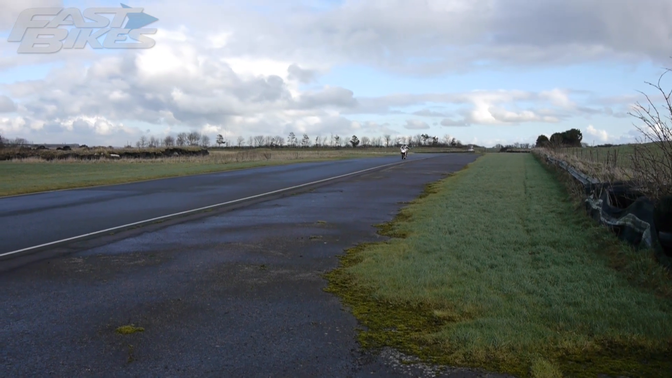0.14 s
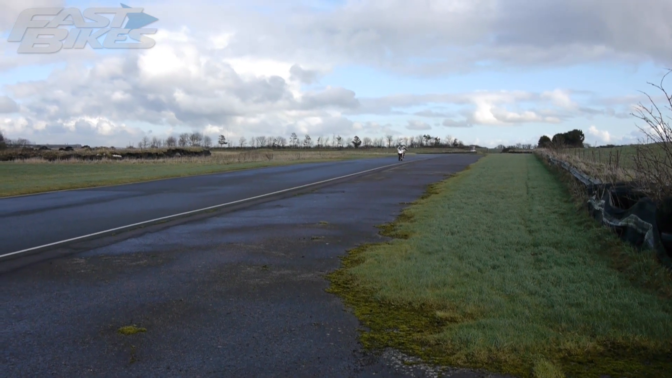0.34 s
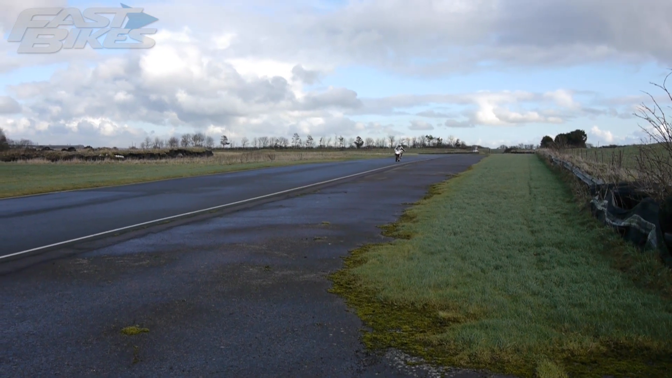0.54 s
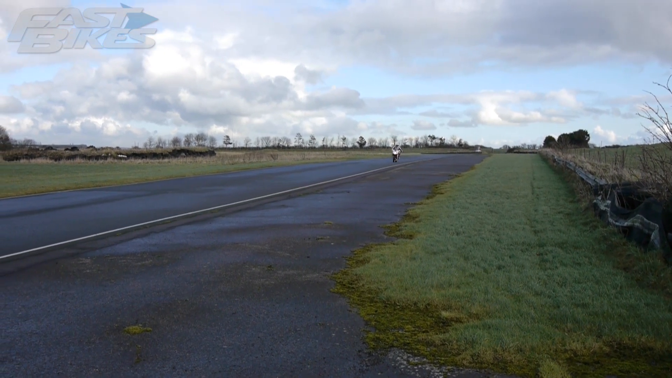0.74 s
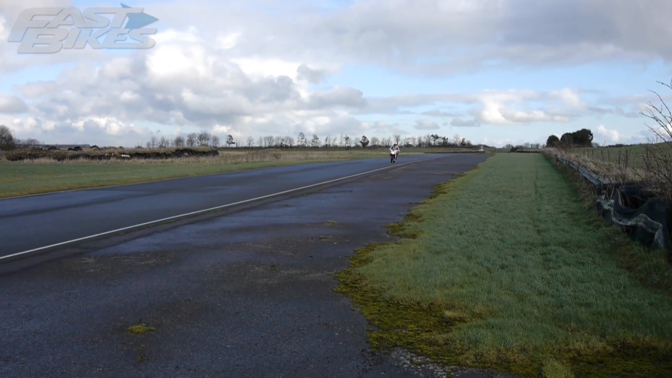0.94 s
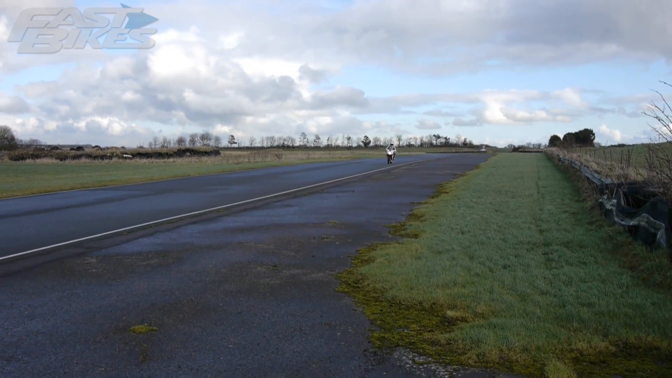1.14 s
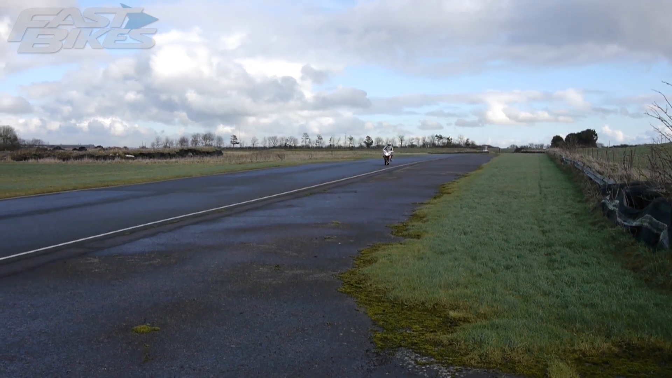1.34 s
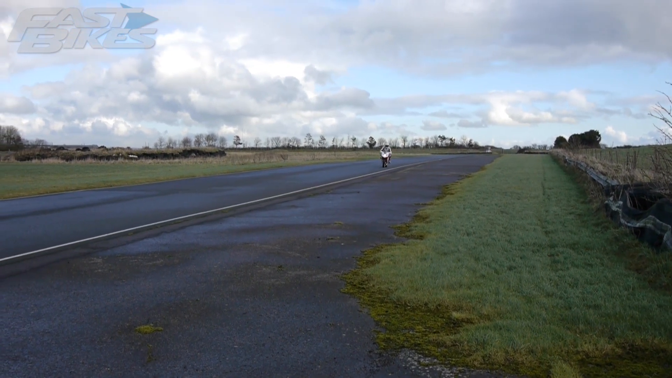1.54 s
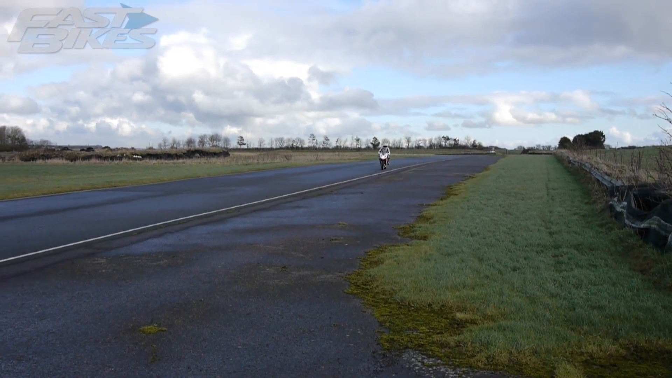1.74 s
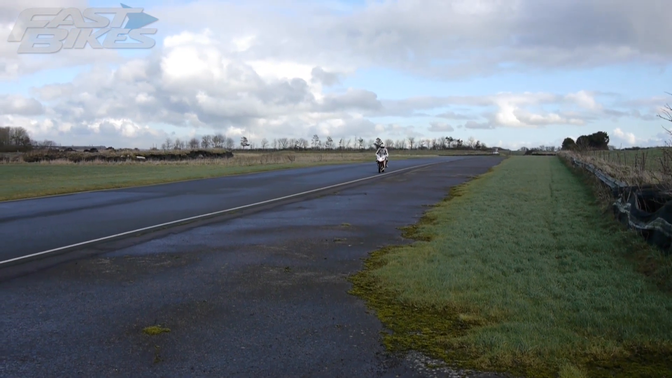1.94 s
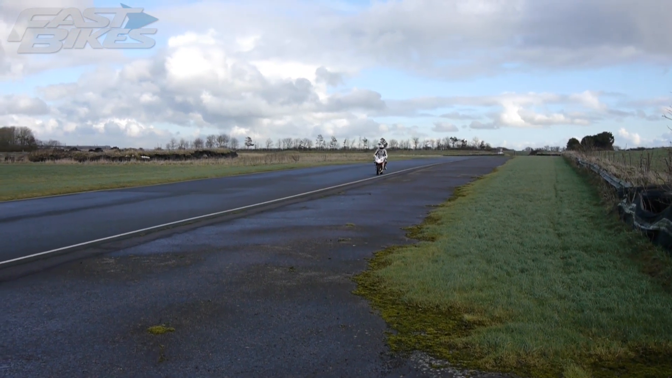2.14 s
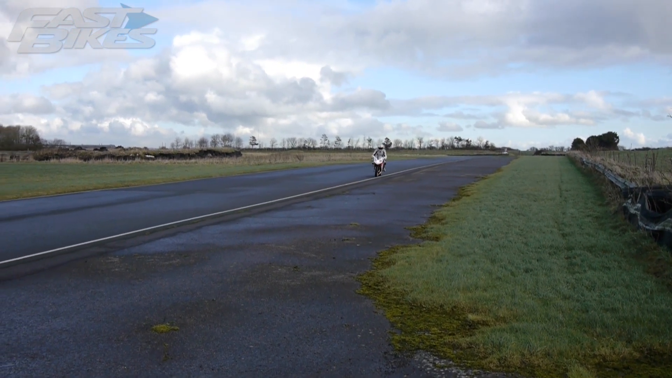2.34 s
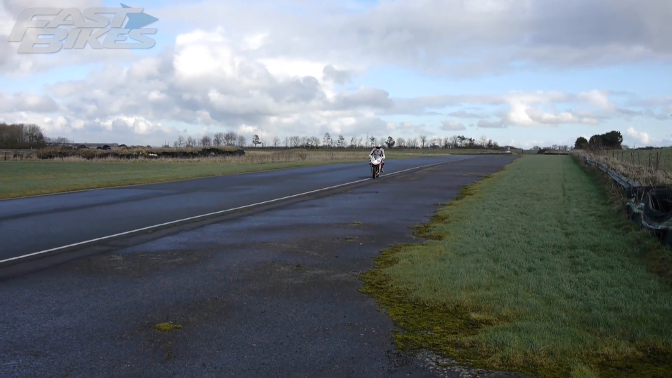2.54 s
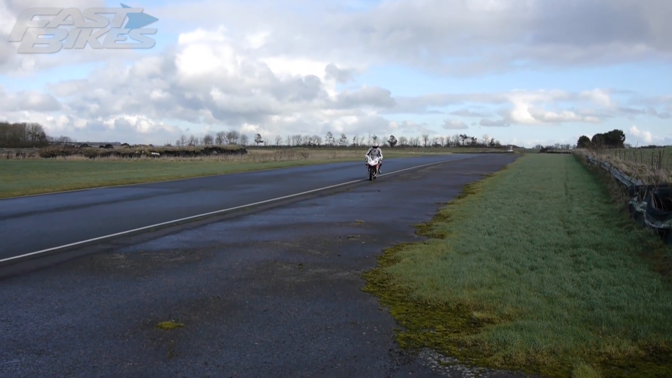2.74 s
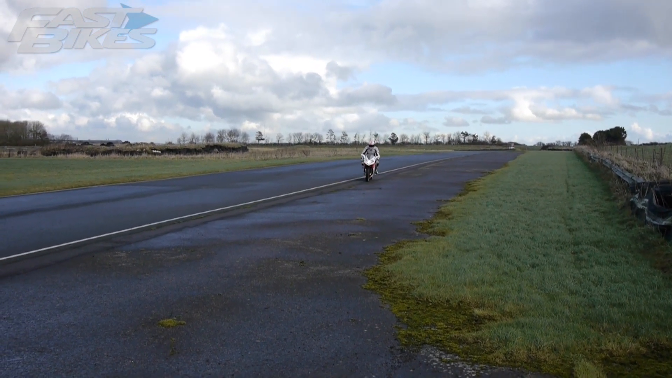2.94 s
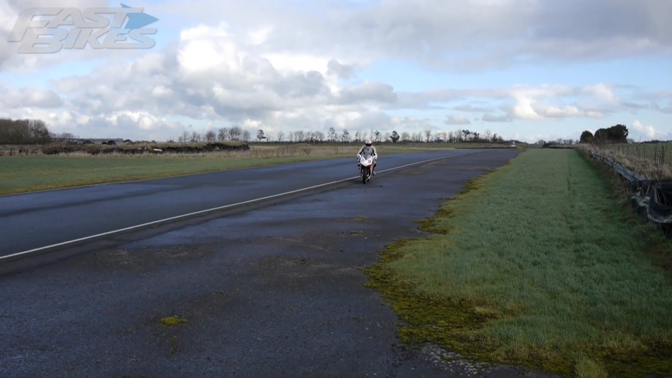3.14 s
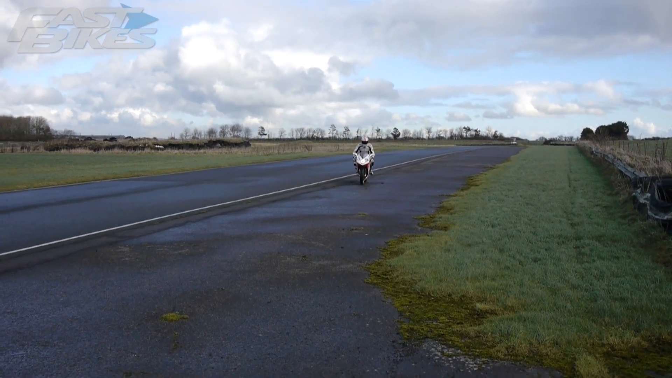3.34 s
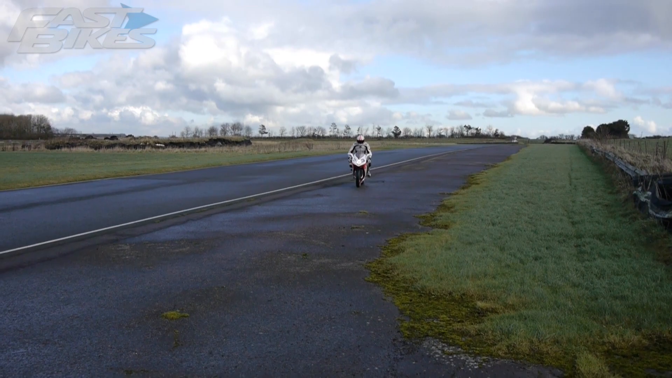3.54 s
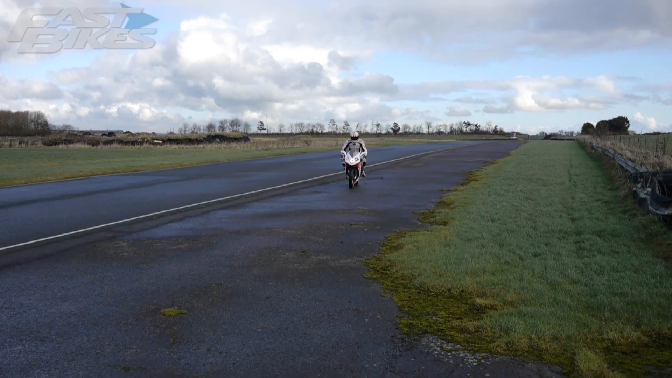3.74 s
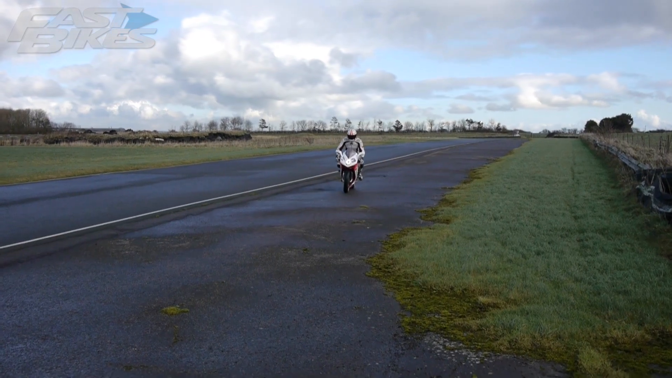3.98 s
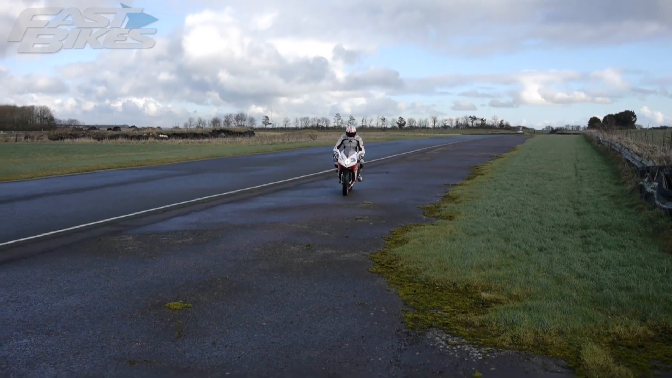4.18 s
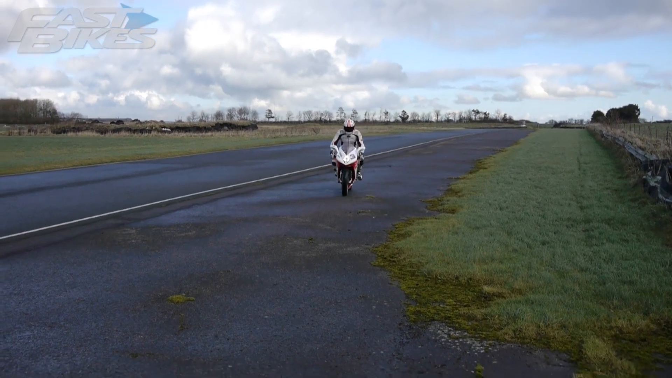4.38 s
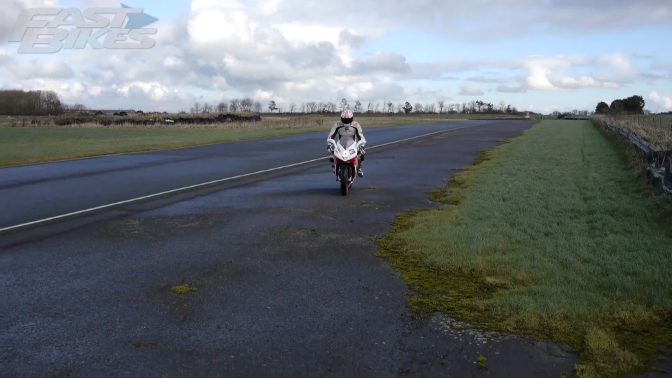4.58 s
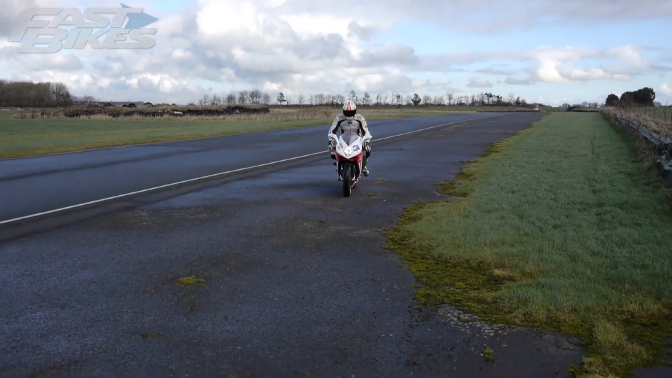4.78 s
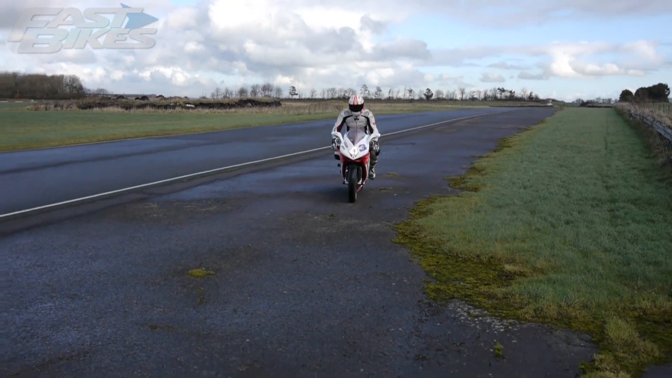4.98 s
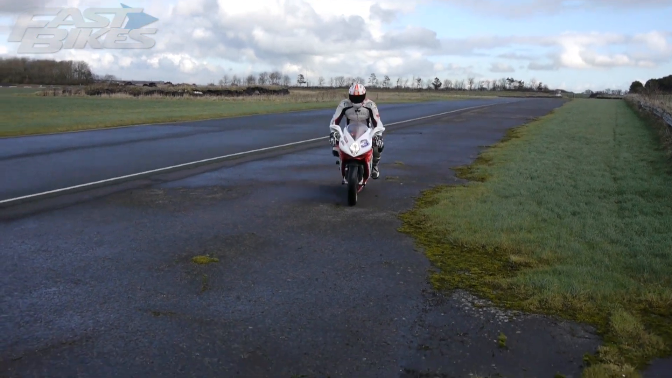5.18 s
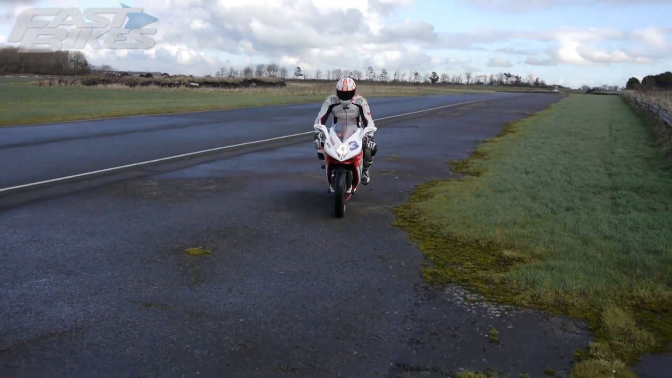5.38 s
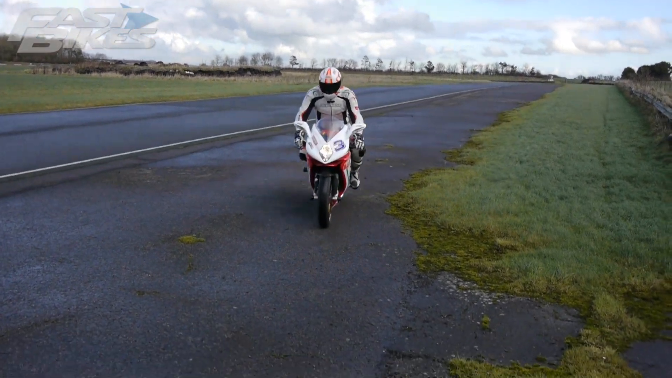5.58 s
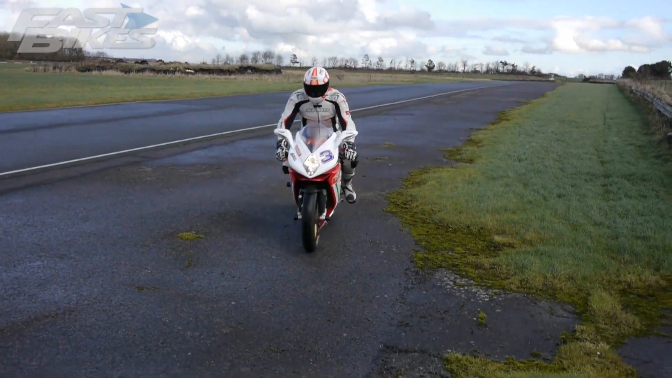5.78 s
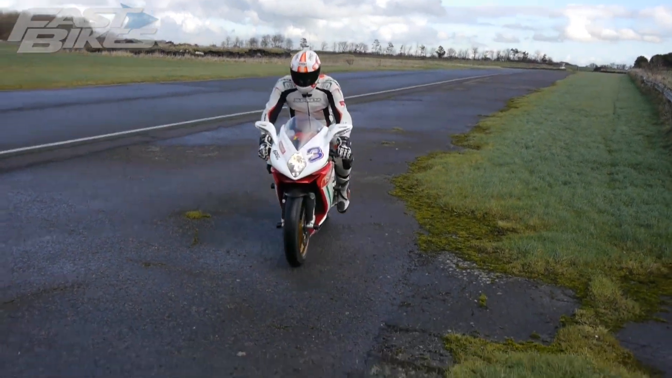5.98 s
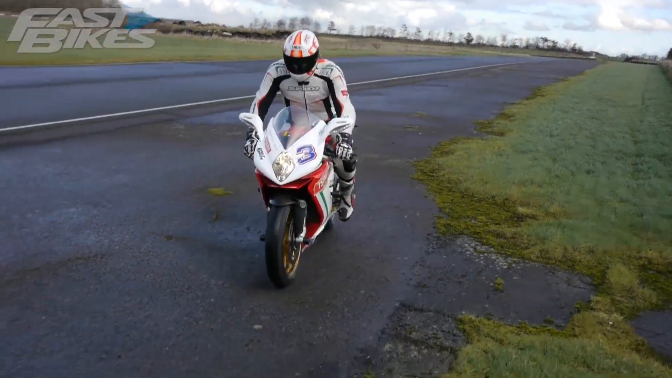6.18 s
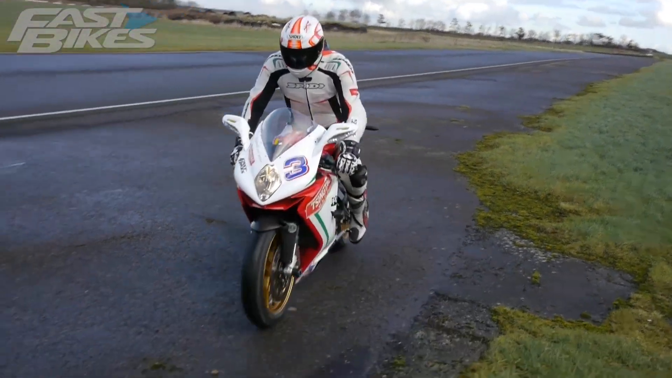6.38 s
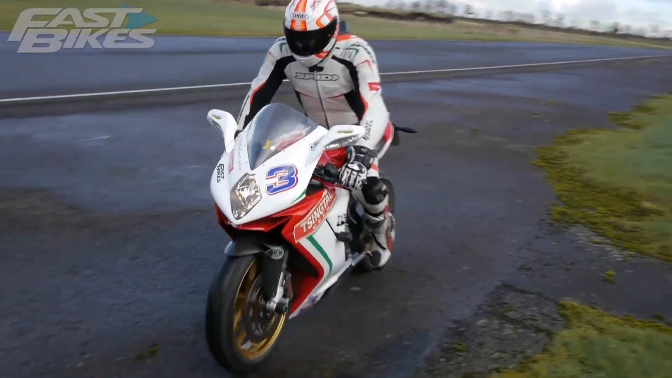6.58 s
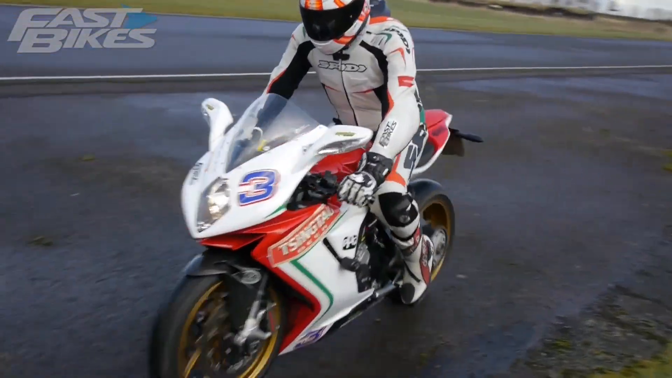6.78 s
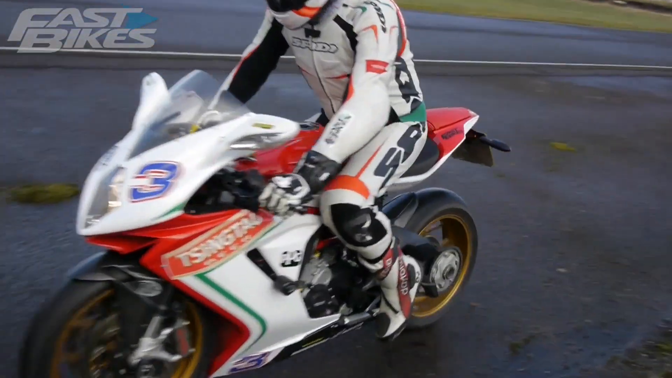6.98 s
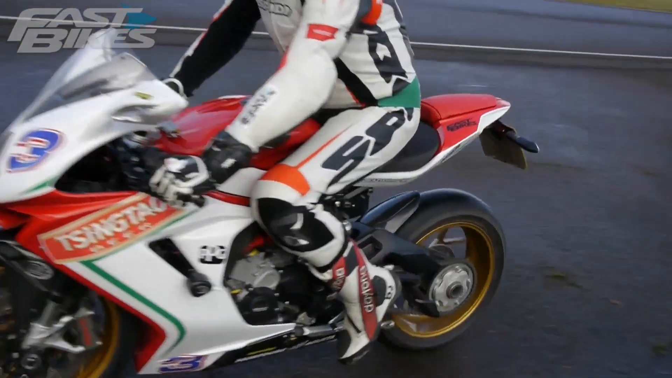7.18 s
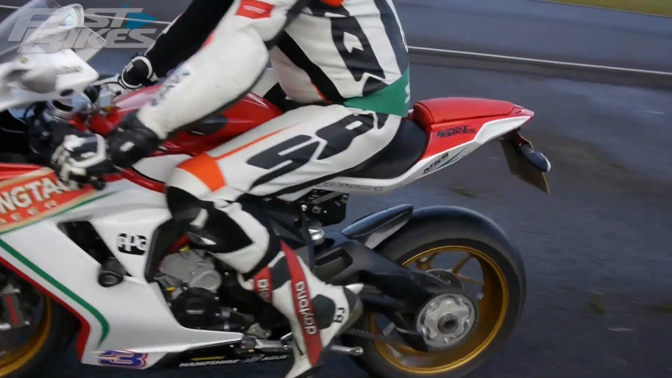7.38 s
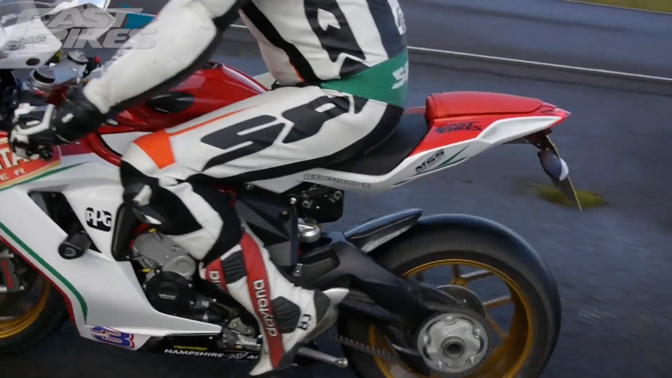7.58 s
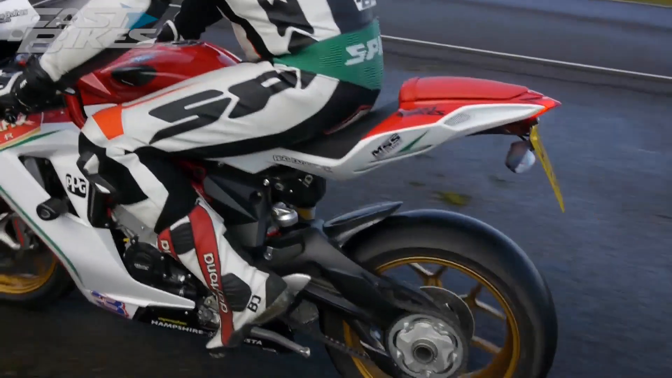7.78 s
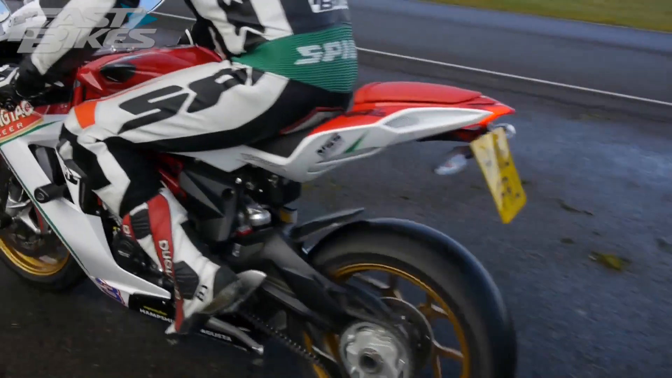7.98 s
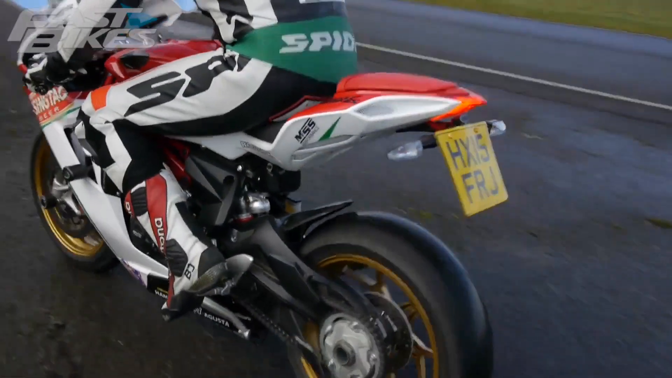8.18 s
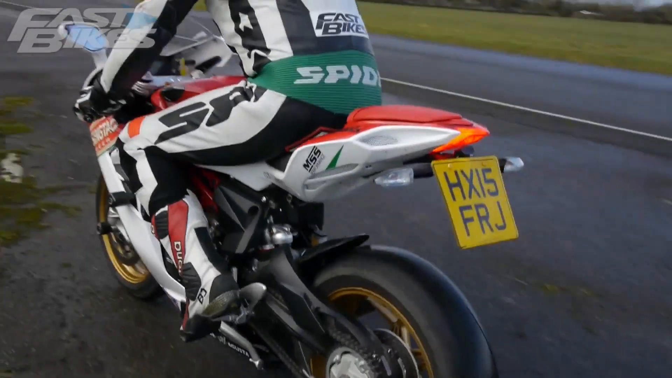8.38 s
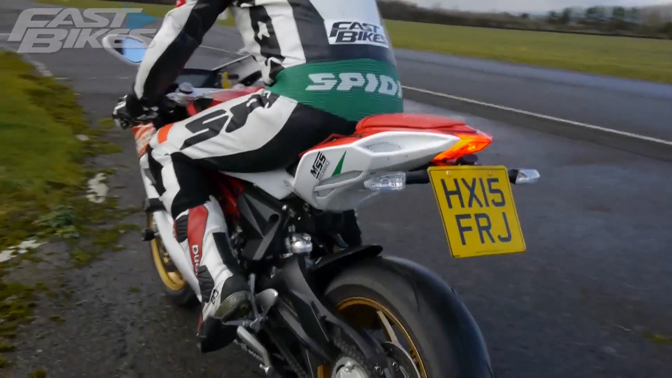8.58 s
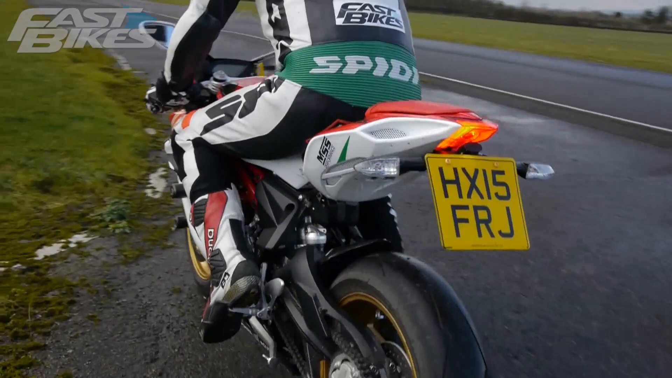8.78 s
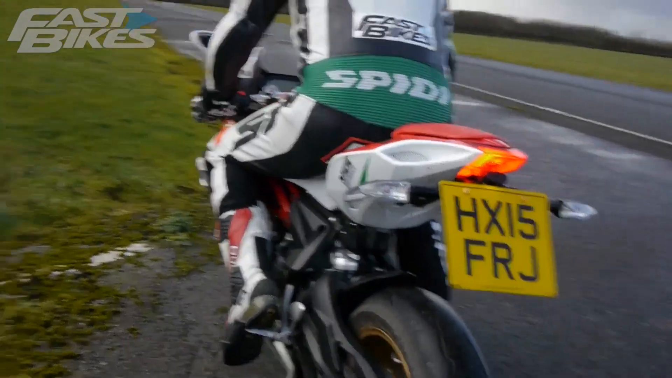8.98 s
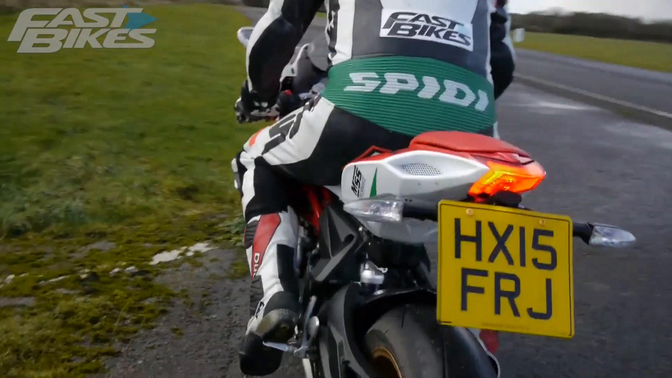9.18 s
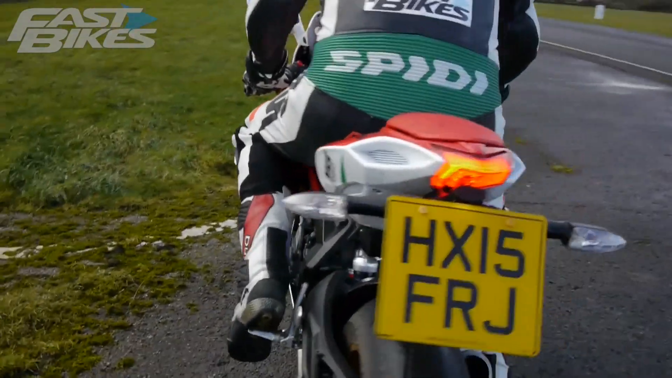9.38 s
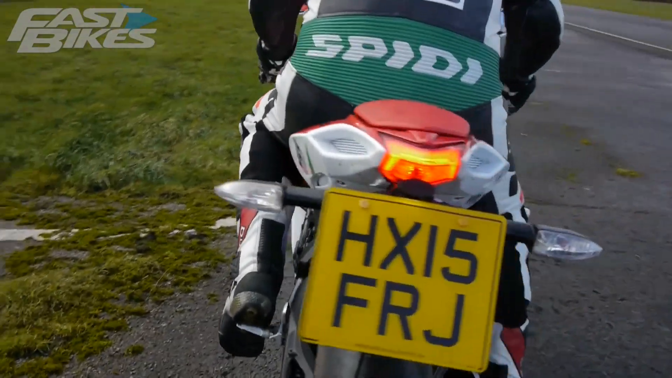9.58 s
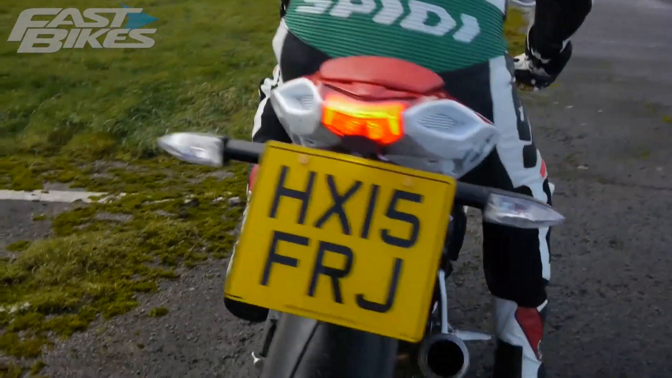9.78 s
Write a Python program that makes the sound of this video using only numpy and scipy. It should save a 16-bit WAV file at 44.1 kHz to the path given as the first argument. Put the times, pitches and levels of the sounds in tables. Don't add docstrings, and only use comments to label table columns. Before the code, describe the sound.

A three-cylinder engine slows from a smooth, moderately distant hum to uneven putters, with small high brake squeaks. The idle catches and becomes a fast train of rounded, ringing thuds, slightly irregular. As the machine rolls by within arm's reach, mechanical roar, chain and tyre hiss and crisp metal ticks swell; then the exhaust outlet faces the listener and the beats turn rough and barking. Open air, dry, nearby stereo microphone, slight wind rumble.

```python
import sys
import numpy as np
from scipy import signal
from scipy.fft import rfft, irfft
from scipy.io import wavfile
from scipy.ndimage import uniform_filter1d

SR = 44100
rng = np.random.default_rng(int(sys.argv[2]) if len(sys.argv) > 2 else 0)


def ratio_of_db(decibels):
    return 10 ** (np.asarray(decibels, float) / 20)


def inscribe(sig):
    pcm = np.round(np.clip(np.atleast_2d(sig).T, -1, 1) * 32767)
    wavfile.write(sys.argv[1], SR, pcm.astype(np.int16))


N = 433503

# t/s, firing rate/Hz
REVS = [(0.0, 151.62), (0.4, 143.83), (1.4, 127.15), (2.0, 113.38), (2.95, 86.79), (3.9, 67.6),
        (4.4, 59.63), (4.6, 47.51), (4.8, 40.55), (5.55, 31.53), (5.95, 37.22), (6.65, 32.74),
        (6.95, 34.45), (7.75, 34.48), (8.05, 32.68), (8.35, 36.79), (9.15, 34.12), (9.83, 37.41)]
# t/s, level/dB
NEARNESS = [(0, -16.5), (1.75, -14), (3.2, -14.5), (4.4, -14), (5.1, -10.5), (6.05, -9), (7.25, 0),
            (8.6, 0), (9.83, -2.5)]
FUEL_BACK_S, IDLE_CATCHES_S = 2.5, 4.4


def rms_one(x):
    return x / np.sqrt(np.mean(x ** 2) + 1e-20)


def in_time(rows, s=None):
    at, *columns = np.transpose(rows)
    return [np.interp(np.arange(N) / SR if s is None else s, at, c) for c in columns]


def at_hz(points, hz):
    known_hz, known_db = np.array(points).T
    return np.interp(np.log(np.maximum(hz, 1)), np.log(known_hz), known_db)


def drift(rate):
    count = int(N / SR * 40) + 2
    return rms_one(np.interp(np.arange(N) / SR * rate, np.arange(count), rng.standard_normal(count)))


def band(x, low_hz, high_hz):
    return signal.sosfiltfilt(signal.butter(2, [low_hz, high_hz], "band", fs=SR, output="sos"), x)


def coloured(spectrum):
    # f/Hz, side minus mid level/dB
    side_width = [(60, -4.5), (150, -40), (380, -25), (950, -16.5), (1400, -14.5), (2380, -9), (5980, -7.5),
                  (15000, -4.5)]
    # f/Hz, left minus right level/dB
    tilt = [(60, 0.4), (380, 0.0), (700, 0.0), (1290, -1.4), (2380, 0.), (4400, 1.7), (8120, -0.3),
            (15000, 0.8)]
    hz = np.arange(N // 2 + 1) * SR / N
    mid_side_db = at_hz(spectrum, hz) + [[0], [1]] * at_hz(side_width, hz)
    mid, side = irfft(rfft(rng.standard_normal((2, N))) * ratio_of_db(mid_side_db), N)
    balance = ratio_of_db(at_hz(tilt, hz) * np.array([[.5], [-.5]]))
    return irfft(rfft([mid + side, mid - side]) * balance, N) / mid.std()


def add(out, seconds, grains):
    for s, grain in zip(seconds, grains):
        i = max(int(s * SR), 0)
        out[..., i:i + grain.shape[-1]] += grain[..., :max(N - i, 0)]


def swell(after, hz, width, turn):
    age = np.maximum(after + 1 / (np.pi * width), 0)
    ring = age ** 2 * np.exp(-2 * np.pi * width * age) * np.sin(2 * np.pi * (hz * after + turn))
    return ring / np.sqrt(np.sum(ring ** 2, axis=-1, keepdims=True))


def burns(turns):
    # t/s, level/dB, f/Hz, how directly the mouth is heard [0 ahead to 1 behind]
    burn = [(2.5, -42.5, 314, 0.6), (2.9, -40.5, 380, 0.59), (3.4, -36.5, 365, -0.13),
            (3.9, -37, 302, -0.45), (4.2, -38.5, 304, 0.41), (4.36, -42.5, 308, 0.35),
            (4.385, -25, 313, 0.42), (4.6, -26.5, 284, 0.4), (5.0, -26, 271, 0.28),
            (5.5, -22.5, 258, -0.057), (6.8, -18, 245.7, -0.0079), (7.1, -20.5, 245, 0.31),
            (7.45, -26, 242, 0.66), (7.75, -25.5, 248, 0.64), (8.0, -34, 261, 1.5), (8.5, -29, 273.5, 1.2),
            (9.0, -30, 287, 1.21), (9.4, -26, 285, 0.96), (9.83, -22.5, 286, 0.82)]
    # t/s, width/Hz
    ring_width = [(3.6, 65.4), (4.8, 51.5), (5.3, 37.5), (6.2, 52.3), (7.2, 50), (7.7, 35.2), (8.1, 42.2),
                  (8.5, 42), (9.4, 43)]
    # t/s, delay/s
    ring_builds = [(3.6, 0.0064), (4.8, 0.0081), (5.3, 0.0071), (6.2, 0.0041), (7.5, 0.0036), (8.3, 0.0047),
                   (9.83, 0.0051)]
    # t/s, f/Hz
    thump_pitch = [(2.7, 205), (4.3, 262), (4.8, 231), (5.3, 197), (6.7, 180.7), (7.5, 181)]
    # t/s, f/Hz
    rasp_pitch = [(4.3, 610), (5.5, 540), (6.4, 564), (7.2, 580), (7.8, 545), (9.83, 503.6)]
    # t/s, level/dB
    rasp_level = [(2.5, -6.5), (3.4, -19), (4.4, -17.5), (5.0, -18), (5.5, -23.5), (6.3, -24.5), (6.8, -26),
                  (7.1, -20.5), (7.45, -9.5), (7.75, -3.5), (8.0, 6), (8.6, 2.5), (9.2, 1.5), (9.83, -1)]
    # t/s, level/dB
    upper_rasp = [(5, -3), (6.2, 7), (6.8, -6), (7.0, 8), (7.3, 9.5), (7.7, 3.5), (8, 1.5), (9, 1.5),
                  (9.6, -5.5)]
    # pitch ratio, width/Hz, level/dB
    rasp_modes = [(1., 48.6, -1), (1.2, 74, -8.5)]
    # t/s, level/dB over the ring, pitch ratio, level/dB more from the short header
    shoulder = [(4.5, -33, 1.9, -4), (4.85, -33, 1.76, 15), (5.15, -29, 1.6, 11), (5.5, -28, 1.46, 12),
                (6.3, -23, 1.44, 9.5), (7.0, -34.5, 1.63, 16), (7.4, -29, 1.52, 9), (7.9, -5.5, 1.54, 11),
                (8.5, -9.5, 1.35, 2), (9.2, -6.5, 1.55, 4.5)]
    cylinder_db = [-1, -0.5, -1.77]
    # t/s, level/dB over the usual firing
    odd = [(2.559, 9), (2.684, 9.5), (2.76, 7.5), (2.984, 5.5), (3.043, -16), (2.86, 3), (3.223, -7),
           (3.425, -5), (4.076, 9.5), (4.138, 13.5), (4.249, 10.5), (4.299, 11.5), (4.316, 9), (4.332, 14),
           (5.801, -2.5), (8.965, -3.5), (4.431, -15), (4.449, -9), (5.589, -2.5), (5.741, -16), (5.83, 1),
           (5.857, -9.5), (6.1, -4.5), (6.472, -3.5), (7.064, -4.5), (8.846, -6), (9.254, -7),
           (9.397, -4.5), (9.508, -4.5), (9.618, -7), (9.728, -6)]
    # t/s, peak level/dB
    barks = [(7.474, -17.5), (7.532, -20), (7.617, -17), (7.647, -20), (7.704, -19.5), (7.76, -20),
             (7.79, -19), (7.821, -21), (7.847, -22), (7.881, -14), (7.94, -21.5), (7.971, -17),
             (8.06, -13), (8.092, -18), (8.15, -11.5), (8.238, -14), (8.267, -18), (8.292, -19),
             (8.375, -19), (8.403, -11.5), (8.453, -22), (8.486, -12.5), (8.514, -19), (8.536, -18.5),
             (8.567, -17.5), (8.596, -17), (8.622, -21), (8.652, -17), (8.681, -20), (8.705, -19),
             (8.736, -23), (8.79, -13.5), (8.818, -11.5), (8.875, -15), (8.904, -10.5), (8.933, -15.5),
             (8.961, -20), (8.992, -18.5), (9.025, -18), (9.05, -14), (9.078, -19), (9.102, -17),
             (9.133, -19), (9.167, -15), (9.198, -14), (9.223, -19), (9.288, -14), (9.314, -17),
             (9.341, -10), (9.421, -15), (9.458, -20), (9.48, -19), (9.531, -20), (9.561, -22),
             (9.589, -17), (9.642, -16), (9.674, -14), (9.704, -25), (9.754, -16), (9.81, -15)]
    # t/s, level/dB
    usual_bark = [(7.4, -15.5), (8.0, -13), (8.5, -15.5), (9.83, -15)]
    # t/s, lateness/ms
    hunt = [(4.382, -0.4), (4.45, -2.2), (4.885, -2.1), (4.962, -3.8), (5.04, -1.9), (5.204, -5.6),
            (5.348, -3.4), (5.437, -4.3), (5.468, -1.5), (5.593, -7.0), (5.655, -3.3), (5.714, -5.9),
            (5.801, 0.6), (5.858, -2.1), (5.885, 0.1), (5.994, -6.5), (6.048, -4.3), (6.103, -5.0),
            (6.159, -2.4), (6.243, -4.5), (6.415, -1.7), (6.474, -4.9), (6.563, -2.4), (6.685, -5.8),
            (6.952, -1.5), (7.068, -5.5), (7.155, -3.1), (7.213, -4.7), (7.416, 0.5), (7.503, -2.1),
            (7.735, -3.6), (7.941, -0.6), (8.181, -3.2), (8.267, -1.1), (8.322, -3.0), (8.377, -1.0),
            (8.569, -2.5), (8.653, -0.2), (8.765, -0.1), (8.85, -5.0), (8.908, -2.6), (8.965, -4.1),
            (9.023, 0.5), (9.11, -2.9), (9.168, -1.1), (9.256, -2.0), (9.284, 1.3), (9.313, 2.2),
            (9.37, -2.1), (9.455, 0.6), (9.511, -3.4), (9.594, -2.5), (9.622, -4.2), (9.676, -1.7),
            (9.731, -2.8), (9.785, 0.1)]
    thump_ahead_db, thump_behind_db = -3.5, 8.5
    thump_lead_s, thump_lead_behind_s = 0.002, .0001
    short_header_fires_s = 5.115

    count = np.arange(np.ceil(turns[int(FUEL_BACK_S * SR)]), turns[-1])
    s = np.interp(count, turns, np.arange(N) / SR)

    def at_burns(rows):
        return [c[:, None] for c in in_time(rows, s)]

    def chance():
        return rng.standard_normal((len(s), 1))

    level_db, hz, mouth = at_burns(burn)
    lean = np.interp(s, [2.5, 4.1, 4.45], [1, 1, 0])[:, None]
    behind = np.interp(s, [6.8, 8.0], [0, 1])[:, None]
    after = np.arange(3400) / SR - .016

    strength_db = (.55 + 1.5 * lean) * chance() + np.array(cylinder_db)[count.astype(int) % 3, None]
    for when, odd_db in odd:
        strength_db[np.argmin(abs(s - when))] = odd_db
    bark_db = np.where(s > 7.4, -3., 0)[:, None] + strength_db
    for when, peak_db in barks:
        bark_db[np.argmin(abs(s + .004 - when))] = 0.5 * (peak_db - in_time(usual_bark, when)[0])

    builds, width = at_burns(ring_builds)[0], at_burns(ring_width)[0]
    ring_hz = hz * (1 + (0.012 + 0.11 * lean + 0.033 * behind) * chance())
    ring_db = (0.85 + 2.5 * behind) * chance() - 0.54 * behind * strength_db
    ring = swell(after - builds, ring_hz, np.clip(width, 20, 200), 0.72 + builds * ring_hz)
    grains = ratio_of_db(ring_db) * ring

    lead = thump_lead_s + thump_lead_behind_s * behind
    thump_hz = at_burns(thump_pitch)[0]
    thump_db = thump_ahead_db + (thump_behind_db - thump_ahead_db) * mouth
    thump = swell(after + lead, thump_hz * (1 + 0.027 * chance()), 73.4 + 8.3 * behind, .7 - lead * thump_hz)
    grains += ratio_of_db(thump_db) * thump

    shoulder_db, shoulder_ratio, short_db = at_burns(shoulder)
    short = (count - count[np.argmin(abs(s - short_header_fires_s))]) % 3 == 0
    shoulder_db = shoulder_db + short_db * short[:, None] + (1.3 + 0.99 * behind) * chance()
    shoulder_hz = hz * (shoulder_ratio + (0.028 + 0.033 * behind) * chance())
    grains += ratio_of_db(shoulder_db) * swell(after - .004, shoulder_hz, 53.0, 0.31 * chance())

    rasp_hz = at_burns(rasp_pitch)[0]
    rasp_db = at_burns(rasp_level)[0] + bark_db - strength_db
    for k, (ratio, mode_width, mode_db) in enumerate(rasp_modes):
        pitch = rasp_hz * (ratio + .13 * k * behind) * (1 + (.025 + .02 * behind) * chance())
        mode_db = rasp_db + mode_db + k * at_burns(upper_rasp)[0] + (2.23 - 0.93 * behind) * chance()
        late = .0021 + 0.00091 * behind
        grains += ratio_of_db(mode_db) * swell(after - late, pitch, mode_width, 0.33 + 0.13 * chance())

    grains *= ratio_of_db(level_db + strength_db) * np.sqrt(SR / at_burns(REVS)[0])
    jitter = (0.0003 + 0.00058 * lean) * chance()
    out = np.zeros(N)
    add(out, s - .016 + in_time(hunt, s)[0] / 1000 + jitter[:, 0], grains)
    return signal.sosfiltfilt(signal.butter(4, 58., "high", fs=SR, output="sos"), out)


def pumping(turns):
    # f/Hz, level/dB
    pump_lows = [(100, -44), (150, -35), (215, -38), (258, -49), (300, -43.5), (355, -48), (400, -46.5),
                 (455, -51)]
    # f/Hz, level/dB
    pump_tops = [(200, 14), (420, 2.5), (560, -6), (680, -8), (780, -12.5), (820, -26.5), (870, -26),
                 (1100, -31), (1270, -15), (1500, -24.5), (1700, -27)]
    between_db = [-33, 3, -10.5, -14.5, 0, -7.5, 0, 6.5, -13, -40]
    above_db = [0, -5, -10, 3.5, -4, -13.5, -1, -7, -4.5, 4.5, -5, -5, 4]
    fuelled_db = [-42, -52.5, -50, -52]
    fuelled_sag = [-9.5, 2, -2.5, 0]
    pump_high_db, pump_gain_db_per_s = -47, 0.5
    fuel_ramp_s, fade_db_per_s = 0.023, 132
    header_hz, header_octaves, header_db = 227, 0.23, 9.5
    sixth_gain_db_per_s = 4

    end, out = int(4.6 * SR), np.zeros(N)
    t, rate = np.arange(end) / SR, in_time(REVS)[0][:end]
    uneven = np.clip((t - FUEL_BACK_S) / fuel_ramp_s, 0, 1)
    fade_db = fade_db_per_s * np.maximum(t - IDLE_CATCHES_S, 0)
    coasting_db = [at_hz(pump_lows, order * rate) for order in (1, 2, 3)] + [pump_high_db]
    orders_db = []
    for free, db, sag in zip(coasting_db, fuelled_db, fuelled_sag):
        fuelled = db + sag * (t - FUEL_BACK_S)
        coasting = free + pump_gain_db_per_s * t
        orders_db.append(uneven * fuelled + (1 - uneven) * coasting - fade_db)
    first_db, second_db, third_db, high_db = orders_db
    off_header = np.log2(3 * rate / header_hz) / header_octaves
    third_db = third_db + uneven * header_db * np.exp(-off_header ** 2)

    for k in range(2, 46):
        hz = k * rate / 3
        if k < 12:
            line_db = {3: first_db, 6: second_db}.get(k, third_db) + between_db[k - 2]
        else:
            step_db = above_db[k - 12] if k < 25 else [0, -9., -8.][k % 3]
            line_db = high_db + at_hz(pump_tops, hz) + step_db - 0.14 * (rate - 105.) * (hz > 1000)
        if k == 18:
            growth_s = np.interp(t, [0, FUEL_BACK_S, 2.8, 3.1], [0, FUEL_BACK_S, FUEL_BACK_S, 0])
            line_db = line_db + sixth_gain_db_per_s * growth_s
        wobble = (.014 + .04 * uneven) * drift(14.)[:end] * np.sqrt(k)
        flutter_db = (0.33 + 2.0 * uneven) * drift(20.0)[:end]
        line = np.sin(2 * np.pi * (k * turns[:end] / 3 - 0.004125 * k * k + wobble))
        out[:end] += ratio_of_db(line_db + flutter_db) * np.sqrt(2) * line
    return out


def rattle(turns):
    # f/Hz, level/dB per Hz
    far_spectrum = [(150, -11.5), (220, -1.5), (300, 4.5), (420, -1.5), (700, -7.5), (900, -11),
                    (1200, -13), (1500, -14), (2800, -15.5), (4000, -20), (5000, -32), (7000, -60),
                    (15500, -76.5)]
    # f/Hz, level/dB per Hz
    near_spectrum = [(600, -31), (900, -14), (1200, 1), (1500, -16), (1970, -1), (2300, -10.5), (2730, 0),
                     (3100, -4), (3700, -8), (4500, -7), (5400, -10), (6300, -10), (7800, -20.5),
                     (9300, -14.5), (11500, -16.5), (15500, -29)]
    # f/Hz, level/dB per Hz
    hiss_spectrum = [(3000, -13.5), (5000, 1), (6200, -1), (7100, -4.5), (7500, -6), (7750, -8), (8100, -9),
                     (9300, -14.5), (10000, -14), (12500, -31), (15500, -47)]
    # t/s, level/dB
    rolling = [(0, -70), (.4, -79), (1.0, -63), (1.75, -61.5), (2.2, -70.5), (2.6, -61.5), (3.2, -60.5),
               (4.4, -62.5), (6.05, -53), (7.25, -46), (8.7, -52)]
    # t/s, f/Hz, share more
    clatter_peak = [(7.0, 3600, 0.24), (7.5, 3700, 0.56), (8.2, 3750, 0.43), (8.35, 6000, 0.45),
                    (8.6, 4650, 0.84), (9.0, 4500, 0.54), (9.45, 4620, 0.64), (9.83, 5000, 0.54)]
    # t/s, share removed
    treble_dip = [(4.4, 0), (5.5, 0.072), (6.6, 0.33), (7.0, 0.37), (7.6, 0.083), (8.4, 0.061), (8.8, 0.33),
                  (9.83, .4)]
    # t/s, lag/ms, share
    tarmac = [(0, .41, .38), (5.0, .4, .42), (6.0, .39, .42), (6.9, .378, .32), (7.35, .35, .1),
              (7.7, .37, .25), (8.33, .38, .33), (8.55, .44, .42), (8.8, .5, .4), (9.1, .485, .4),
              (9.35, .505, .45), (9.55, .48, .45), (9.83, .41, .42)]
    roar_db, clatter_db, clatter_follows = -32.5, -39, 1.61
    coasting_quiet = 0.15

    t, now = np.arange(N) / SR, np.arange(N)
    nearness_db, hiss_db = in_time(NEARNESS) + in_time(rolling)
    throb = np.cos(2 * np.pi * (turns + 0.44)) + .5 * np.cos(4 * np.pi * turns) + 0.41 * np.cos(6 * np.pi * turns)
    far = ratio_of_db(roar_db + nearness_db + 0.56 * throb + .5 * drift(14.)) * coloured(far_spectrum)
    far = far - coasting_quiet * (t < FUEL_BACK_S) * band(far, 170., 680.0)
    hiss = ratio_of_db(hiss_db + 2.3 * drift(10.0)) * coloured(hiss_spectrum)

    contacts = ratio_of_db(4.75 * np.minimum(rng.exponential(1, N // 60 + 1), 4.2)).repeat(60)[:N]
    near_db = clatter_db + clatter_follows * nearness_db + 1.3 * throb + 0.31 * drift(19.0)
    near = ratio_of_db(near_db) * coloured(near_spectrum) * rms_one(contacts + 3.4)
    hidden = np.interp(t, [4.8, 6.8, 7.4, 8.6], [0.6, 0, 0.31, 0.7])
    near = near - hidden * band(near, 8700.0, 19000)
    for low_hz in (1150, 1500, 1950, 2500, 3200, 4200, 5400, 7000, 9000):
        near = near + 0.26 * drift(18.) * band(near, low_hz, 1.156 * low_hz)
    peak_hz, peak_share = in_time(clatter_peak)
    for hz in (3700, 4500, 5300, 6100):
        boost_share = peak_share * np.exp(-((peak_hz - hz) / 600) ** 2)
        near = near + boost_share * (1 + .4 * throb) * band(near, hz - 350, hz + 350)

    direct = far + hiss + near
    direct = direct - in_time(treble_dip)[0] * band(direct, 4540.0, 7900.0)
    lag_ms, share = in_time(tarmac)
    treble = band(direct, 3400, 11500)
    echo = np.array([np.interp(now - lag_ms * SR / 1000, now, c) for c in treble])
    return direct - share * echo


def gears(turns):
    # teeth per firing, t/s, length/s, level/dB
    whines = [(23.2, 1.3, .5, -71), (25.7, .95, .3, -72), (25.9, 1.85, .4, -69), (30., 1.4, .4, -69),
              (33.5, 1.7, .4, -70), (36.3, 1.1, .4, -79), (36.5, 2.1, .3, -73), (62., 1.5, .3, -81),
              (68., 1.75, .3, -81)]
    t, out = np.arange(int(3 * SR)) / SR, np.zeros(N)
    end = len(t)
    for teeth, s, length, db in whines:
        level = ratio_of_db(db + 5.5 + 3.5 * drift(25.)[:end])
        passing = np.exp(-((t - s) / length / 1.15) ** 2)
        phase = teeth * turns[:end] + .2 * drift(30.)[:end]
        out[:end] += level * passing * np.sin(2 * np.pi * phase)
    return out


def ticks():
    # t/s, peak level/dB, f/Hz
    metal_ticks = [(3.4728, -43, 9100), (5.1914, -44.5, 8100), (5.79, -45, 9000), (6.6894, -47, 9400),
                   (6.974, -35, 9000), (7.21, -40, 12000),
                   (7.4673, -34.5, 11000), (7.685, -36.5, 10000), (7.791, -38, 9300), (7.8339, -42, 9630),
                   (7.862, -34, 9800), (7.952, -38, 7660), (8.019, -32, 9130), (8.0724, -38, 9400),
                   (8.1033, -33, 9410), (8.19, -36, 9570), (8.2201, -38, 8650), (8.3612, -39, 9990),
                   (8.4256, -36, 9540), (8.4969, -41, 10500), (8.5244, -39, 10500), (8.551, -40, 7660),
                   (8.6645, -46, 7670), (8.7204, -40, 8950), (8.8591, -38, 10000), (8.8875, -42, 8820),
                   (8.9743, -39, 10800), (9.007, -34.5, 7500), (9.0357, -37, 9050), (9.0911, -39, 7510),
                   (9.12, -38, 9660), (9.1509, -39, 9460), (9.208, -37, 10100), (9.2372, -39.5, 9300),
                   (9.2682, -42, 9400), (9.298, -37, 7550), (9.3265, -40, 8400), (9.339, -35, 8910),
                   (9.3799, -41, 9960), (9.4104, -36, 9290), (9.4664, -38, 7900), (9.5196, -44, 7530),
                   (9.548, -40, 10100), (9.577, -40, 7700), (9.6304, -42, 8480), (9.671, -42, 8100),
                   (9.6977, -41, 8100), (9.6985, -38, 8240), (9.7685, -38, 8290), (9.7975, -39, 10700),
                   (9.8089, -36, 8330)]
    rows = metal_ticks
    age, out = np.arange(500) / SR, np.zeros((2, N))
    hiss = band(rng.standard_normal((len(rows), 3, 500)), 4800.0, 12000.0)
    grains = []
    for (s, db, hz), h in zip(rows, hiss):
        burst = 0.5 * np.sin(2 * np.pi * hz * age) + 1.3 * h[0] + 0.7 * h[1:]
        grains.append(ratio_of_db(db - 3.0) * np.exp(-age / 0.0037) * burst)
    add(out, [row[0] for row in rows], grains)
    return out


def brake():
    # t/s, length/s, f/Hz, level/dB, octave level/dB
    squeaks = [
        (2.29, 0.048, 5690, -52, -32),
        (2.37, 0.03, 5570, -44, -19),
        (2.51, 0.024, 5600, -48, -15),
        (2.7, .1, 15700, -83, -60),
        (2.9, .6, 7670, -63, -63),
        (2.44, .05, 5440, -62, -30),
        (4.277, 0.043, 5900, -58, -27),
        (4.5, 0.026, 5550, -39, -17),
        (5.03, 0.025, 5550, -45.5, -30),
    ]
    t, out = np.arange(N) / SR, np.zeros(N)
    shake = uniform_filter1d(rng.standard_normal(N), size=70)
    slip_db = 5. * rms_one(uniform_filter1d(rng.standard_normal(N), size=220))
    for s, length, hz, db, octave_db in squeaks:
        near = slice(int((s - 3 * length) * SR), int((s + 3 * length) * SR))
        phase = 2 * np.pi * np.cumsum(hz + 830.0 * shake[near]) / SR
        squeal = np.sin(phase) + ratio_of_db(octave_db) * np.sin(2 * phase)
        press = np.exp(-((t[near] - s) / length / 1.3) ** 2)
        out[near] += ratio_of_db(db - 6.0 + slip_db[near]) * press * squeal
    return out


def wind():
    wind_db, follows, gust_db = -82, .8, -3
    white = rng.standard_normal((3, N))
    low = signal.butter(2, [25., 70.], "band", fs=SR, output="sos")
    rumble = signal.sosfilt(low, white[0] + .6 * white[1:])
    return ratio_of_db(wind_db + follows * in_time(NEARNESS)[0] + gust_db * drift(4.0)) * rms_one(rumble)


def scene():
    first_turn = .111
    turns = np.cumsum(in_time(REVS)[0]) / SR + first_turn
    pipe = pumping(turns) + burns(turns)
    sway = 0.017 * drift(6.0) * np.array([[1], [-1]])
    return pipe * (1 + sway) + rattle(turns) + gears(turns) + ticks() + brake() + wind()


def low_pass(x):
    return signal.sosfilt(signal.butter(12, 15730, fs=SR, output="sos"), x)


def record(dry):
    cut = signal.sosfilt(signal.butter(2, 35., "high", fs=SR, output="sos"), dry)
    limited = cut / (1 + np.abs(cut / .5) ** 10) ** (1 / 10)
    return low_pass(limited)


dry = scene()
out = record(dry)
inscribe(out)
```